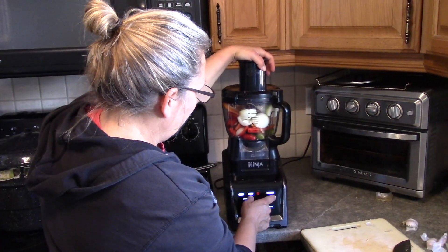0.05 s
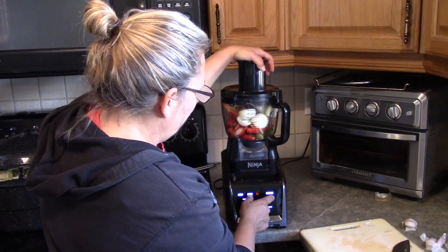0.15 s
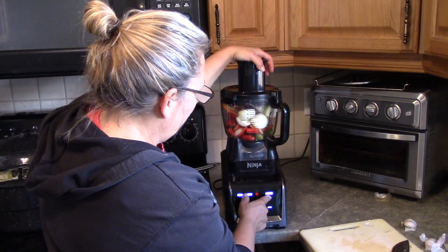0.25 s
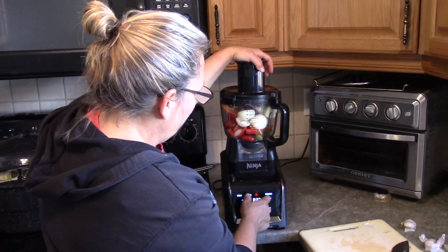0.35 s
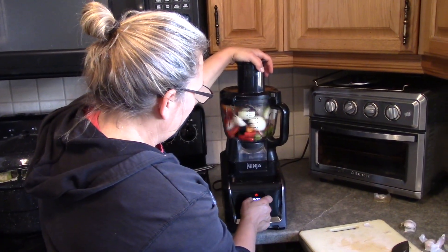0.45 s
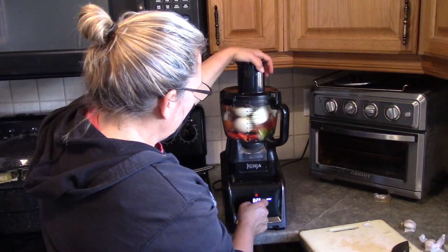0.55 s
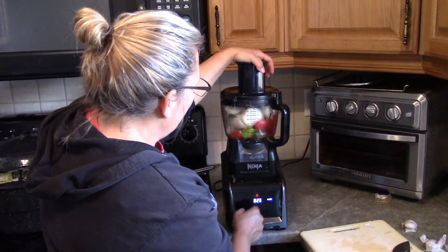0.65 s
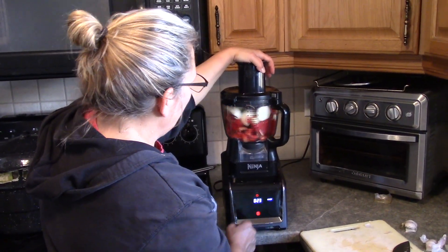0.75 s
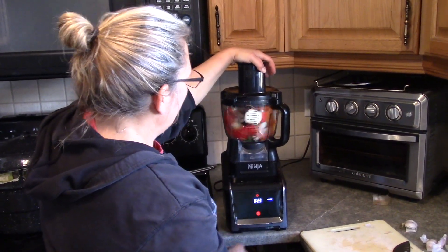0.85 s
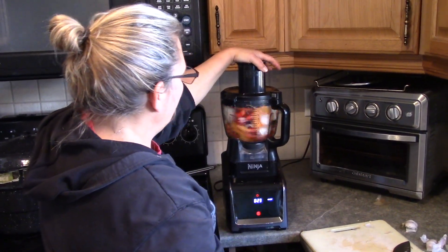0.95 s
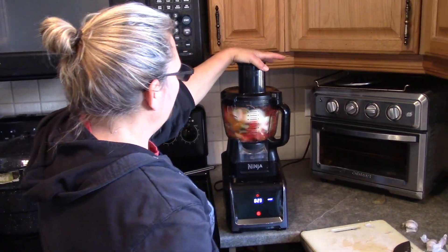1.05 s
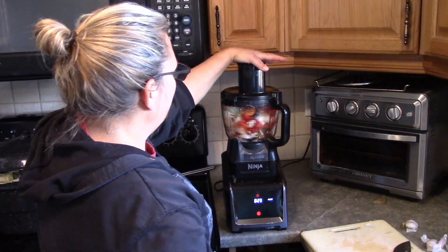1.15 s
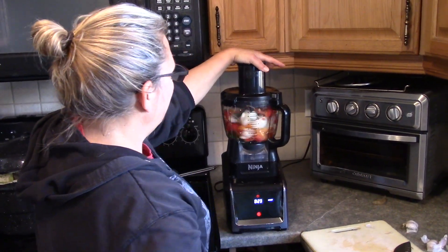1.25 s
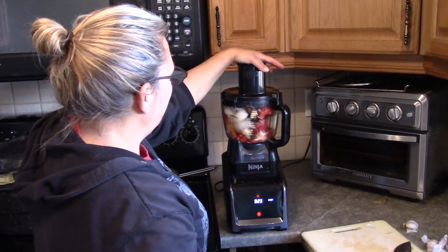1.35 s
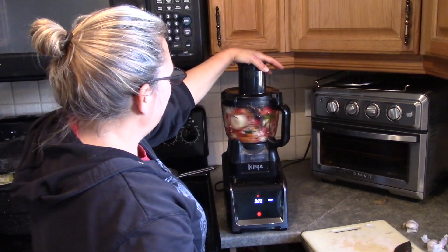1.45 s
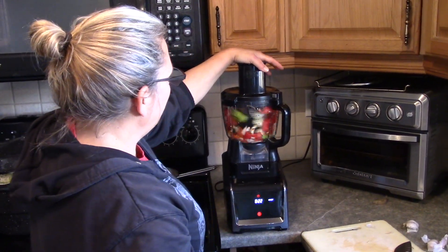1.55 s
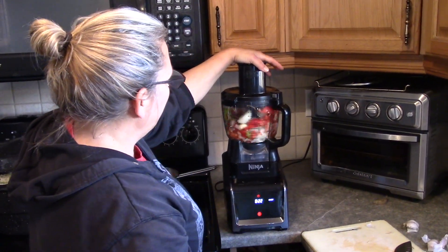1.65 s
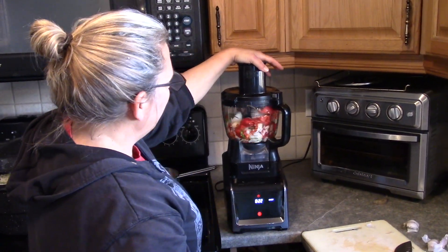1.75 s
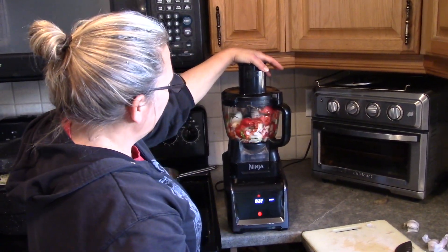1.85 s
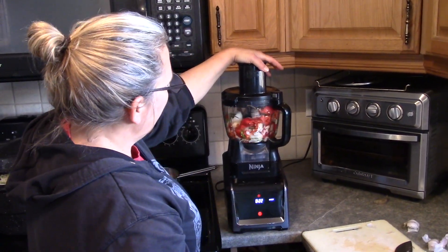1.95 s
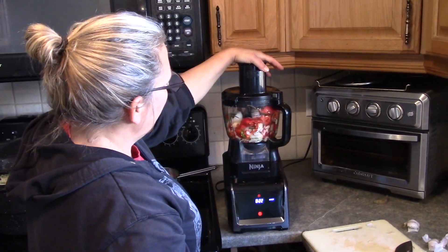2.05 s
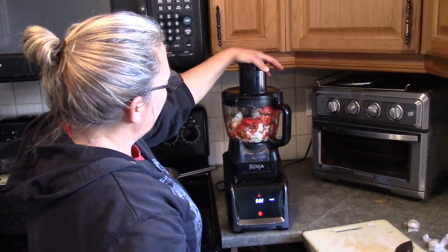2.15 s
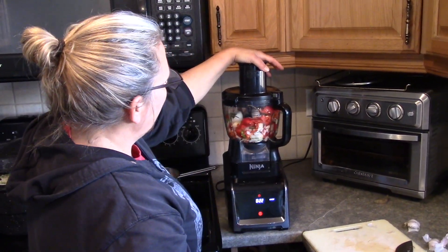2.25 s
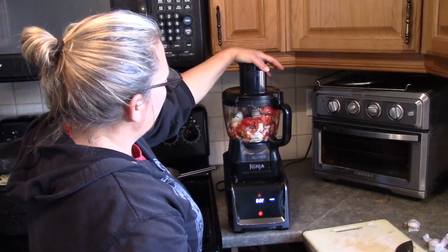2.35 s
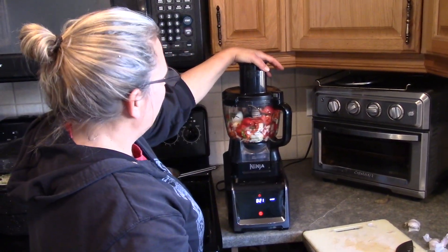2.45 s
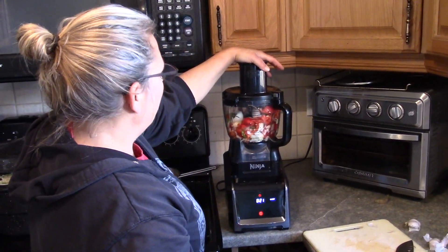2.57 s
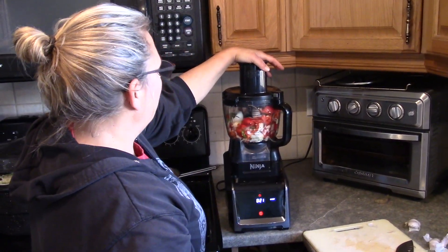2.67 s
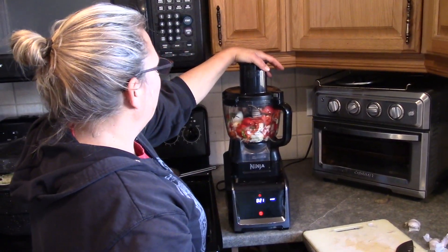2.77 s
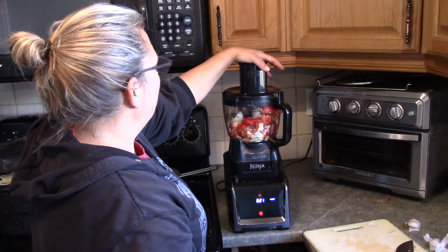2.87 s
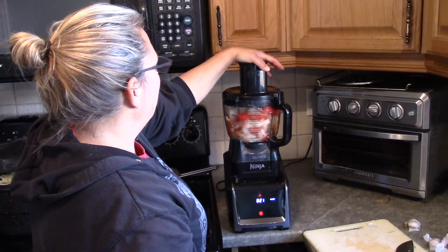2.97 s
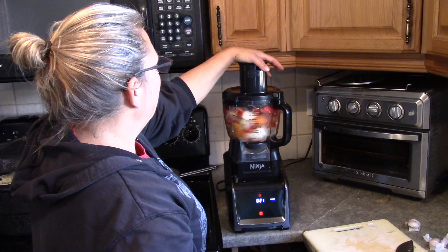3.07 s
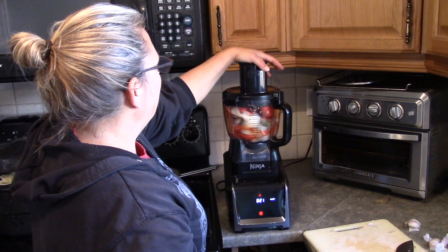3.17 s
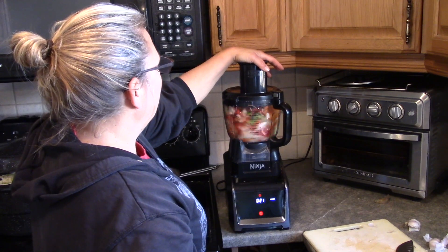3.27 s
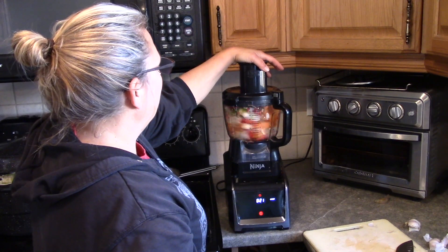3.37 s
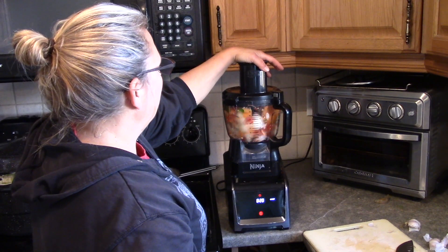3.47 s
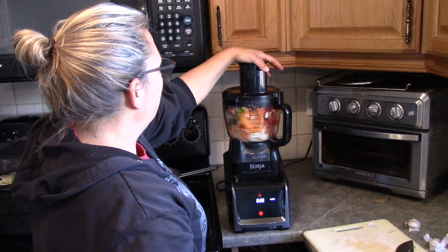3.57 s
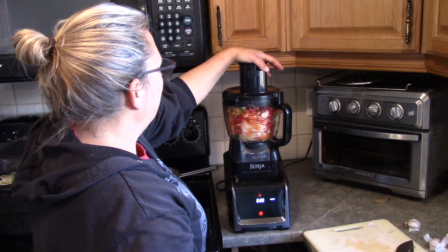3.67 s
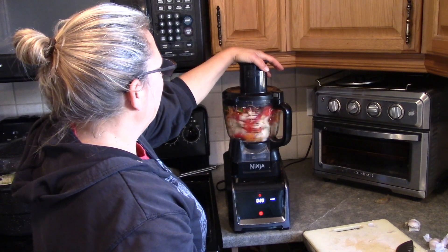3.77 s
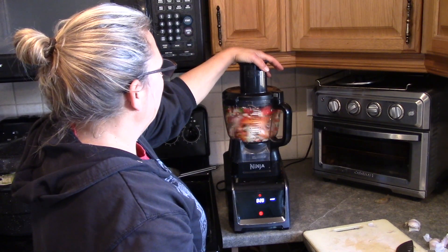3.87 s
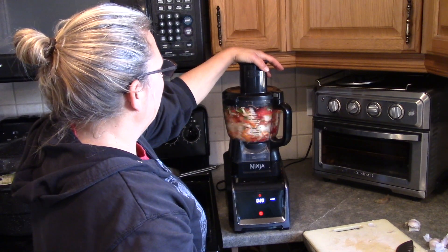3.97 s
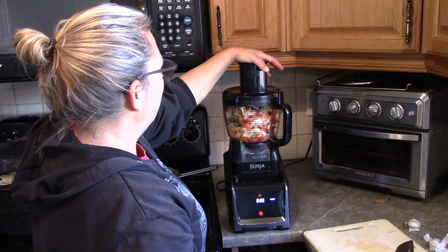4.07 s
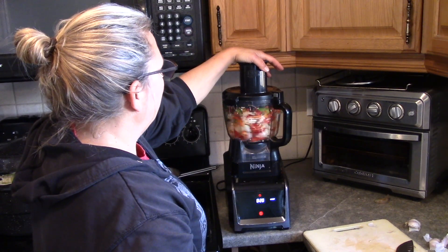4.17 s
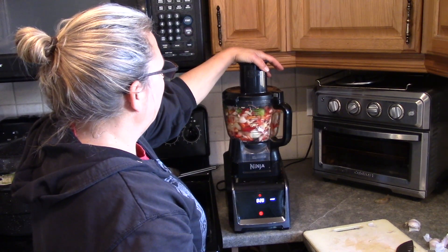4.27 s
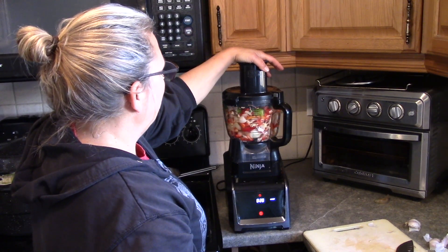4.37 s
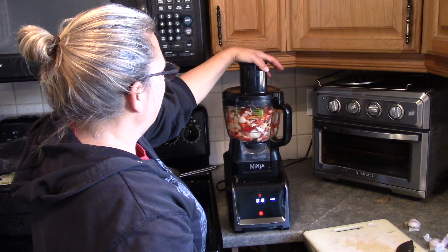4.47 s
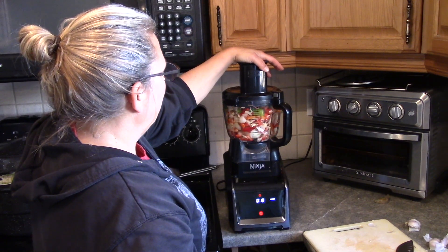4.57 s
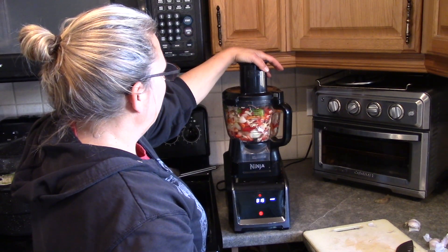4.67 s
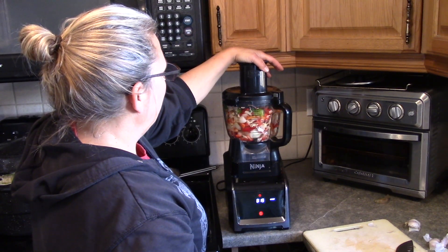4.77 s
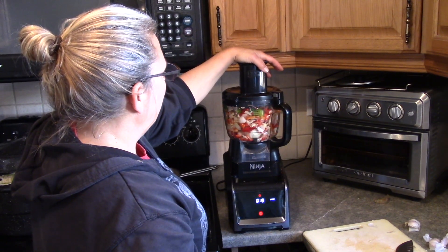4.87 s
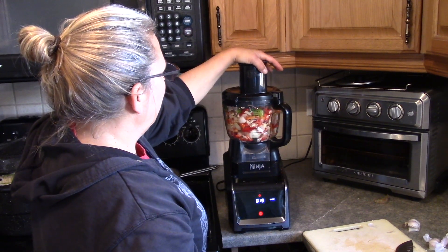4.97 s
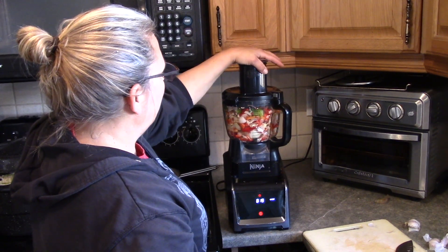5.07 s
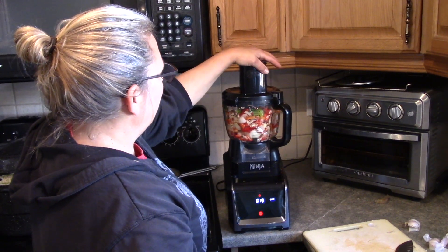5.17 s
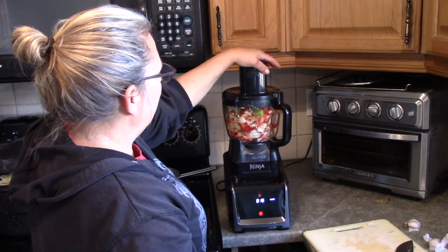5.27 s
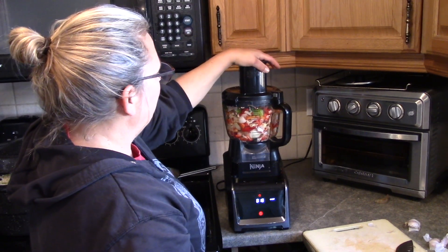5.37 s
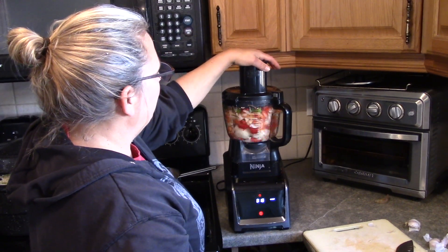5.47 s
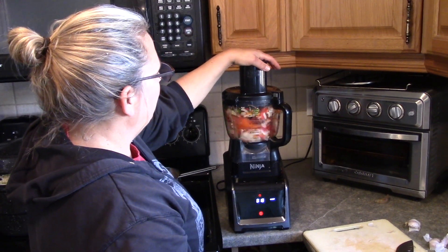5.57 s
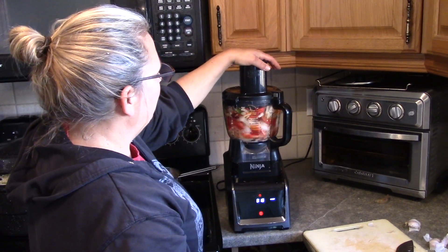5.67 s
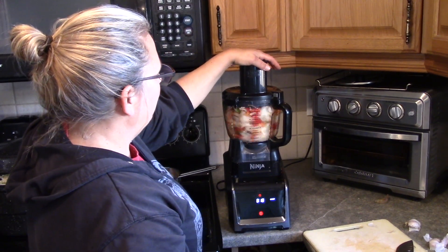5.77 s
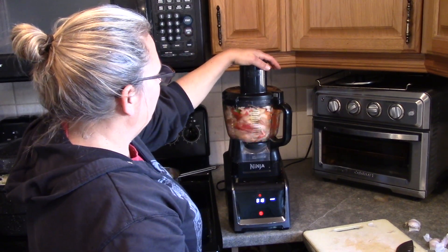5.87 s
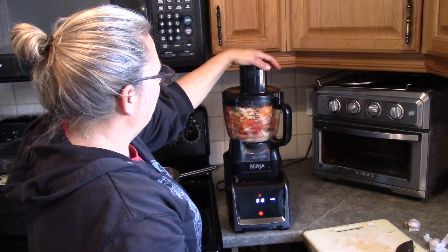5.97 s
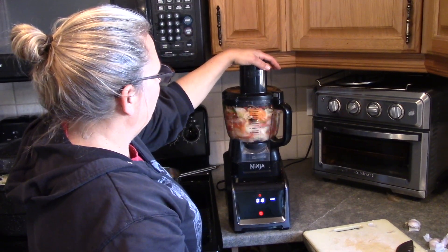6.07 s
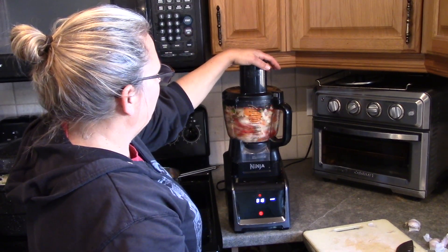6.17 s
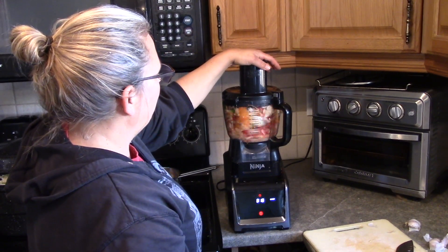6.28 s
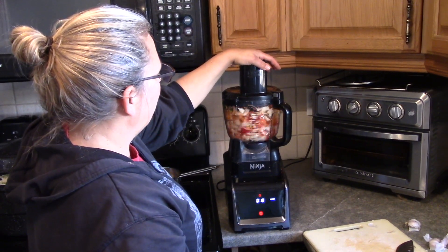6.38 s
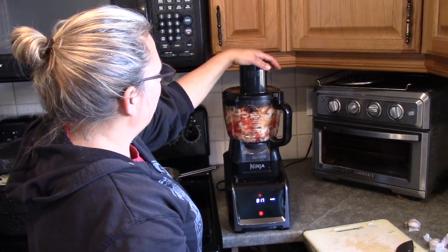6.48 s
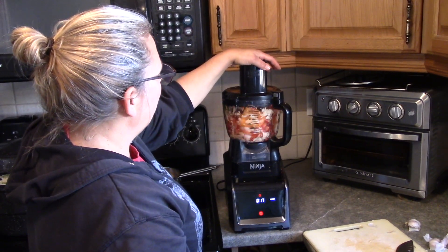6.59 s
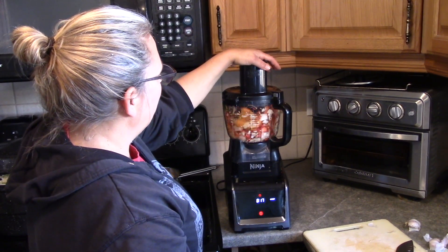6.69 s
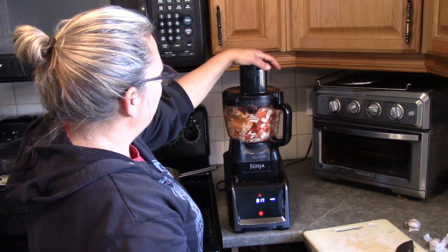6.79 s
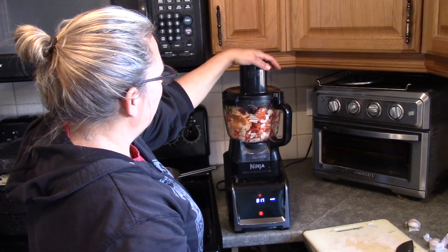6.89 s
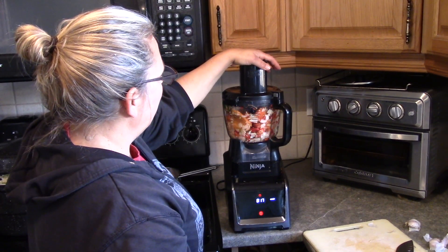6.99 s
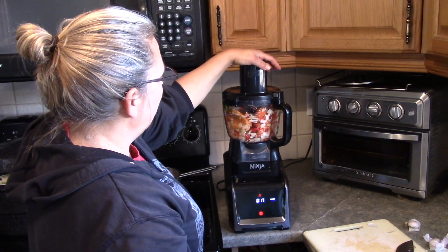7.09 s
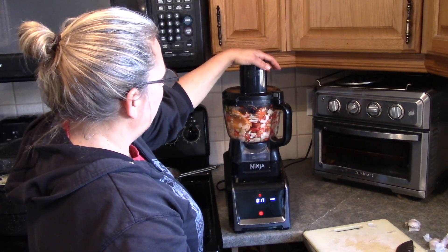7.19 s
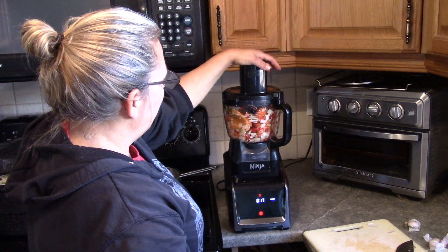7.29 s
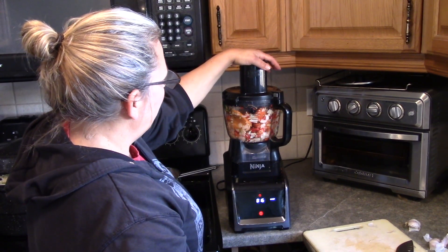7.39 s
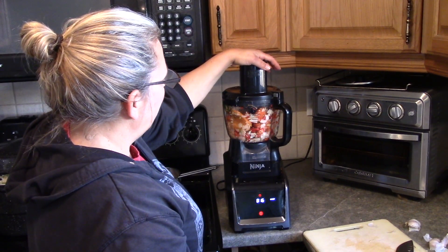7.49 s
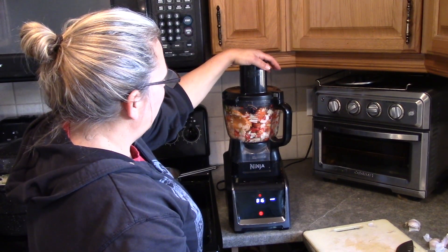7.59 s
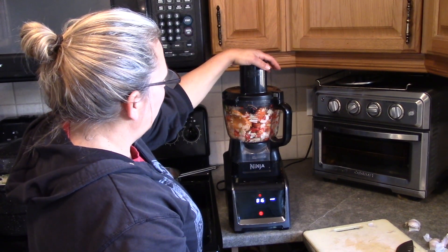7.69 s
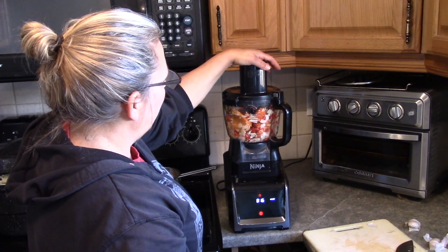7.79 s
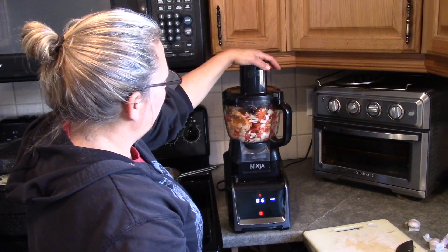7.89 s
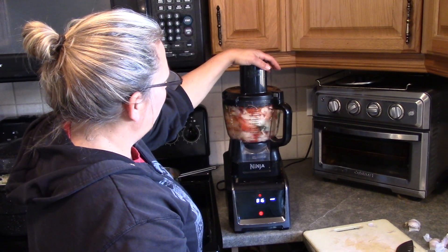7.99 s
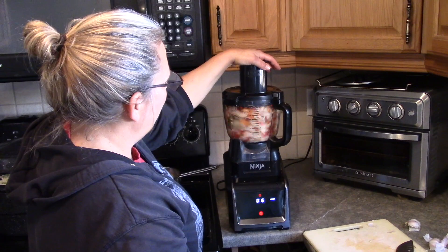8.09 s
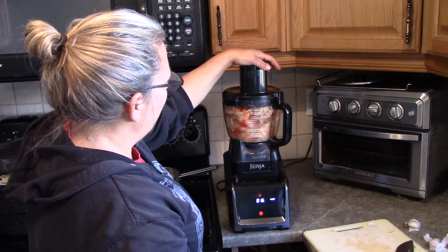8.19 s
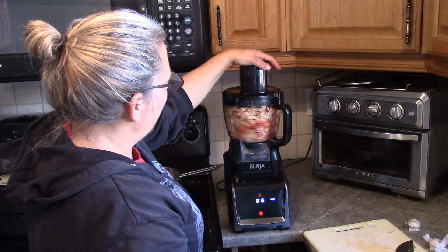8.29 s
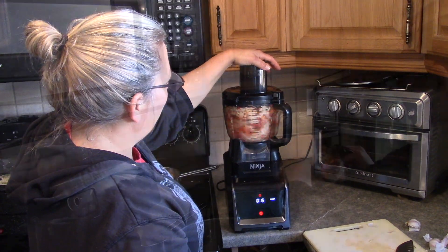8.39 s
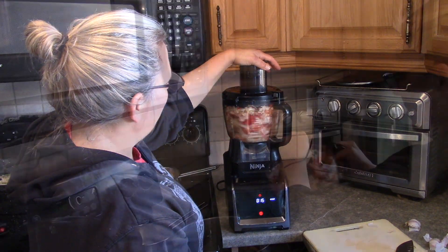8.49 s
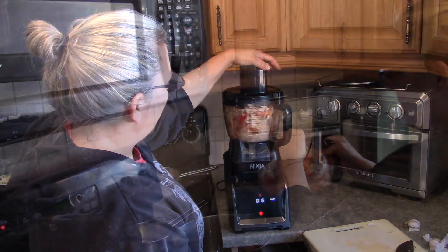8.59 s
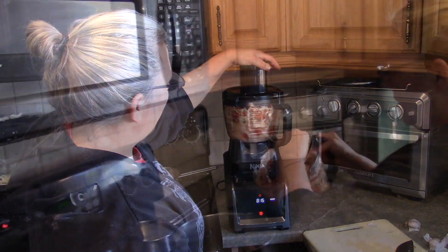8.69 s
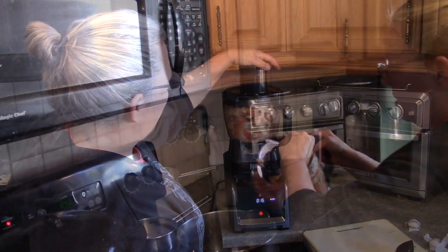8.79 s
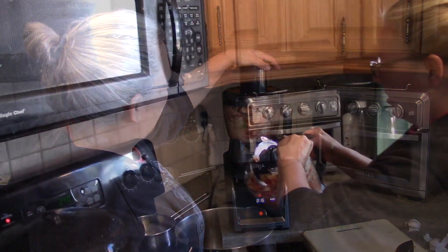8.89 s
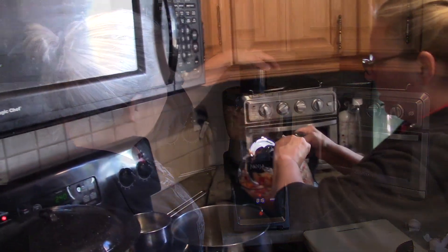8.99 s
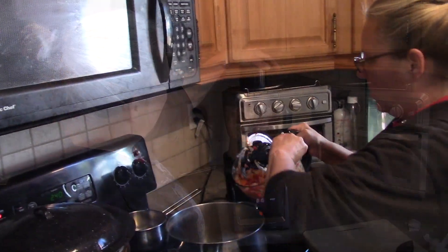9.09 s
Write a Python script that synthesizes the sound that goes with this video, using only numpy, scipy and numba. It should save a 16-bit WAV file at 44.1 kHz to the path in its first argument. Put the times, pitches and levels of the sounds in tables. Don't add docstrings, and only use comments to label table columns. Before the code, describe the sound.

Close to a nearly mono camera microphone, a food processor runs in four evenly spaced bursts. Each starts with a clack and rough lurch, climbs quickly in pitch, then sags into a shuddering coast as chopped pieces hail on the housing and the fan hisses. Low kitchen hum fills the gaps, with small metallic clicks and several dull knocks before the third burst. The first kick is sharpest, and the final coast fades away.

```python
import sys
import numpy as np
from scipy import signal
from scipy.fft import rfft, irfft, next_fast_len
from scipy.io import wavfile
from scipy.ndimage import uniform_filter1d
from numba import njit

SR = 44100
rng = np.random.default_rng(int(sys.argv[2]) if len(sys.argv) > 2 else 0)


def attenuation_scalar(level_db):
    decades = np.asarray(level_db, float) / 20
    return 10 ** decades


def unload_wav(signal):
    wavfile.write(
        sys.argv[1],
        SR,
        np.round(np.clip(np.atleast_2d(signal).T, -1, 1) * 32767).astype(np.int16),
    )


N = 403377

# start_s, peak_db, ring_share_db
STARTS = [
    (0.4078, -5.5, -9.5),
    (2.9072, -16.5, -11),
    (5.4078, -13, -10),
    (7.9074, -18.5, -9),
]


def level(x, db):
    return x * attenuation_scalar(db) / np.sqrt(np.mean(x ** 2))


@njit
def svf(x, hz, width):
    y, b, l = np.empty(len(x)), 0., 0.
    g, k = np.tan(np.pi * hz / SR), width / hz
    for i in range(len(x)):
        v = (b + g * (x[i] - l)) / (1 + g * (g + k))
        b, l, y[i] = 2 * v - b, l + 2 * g * v, k * v
    return y


def steep_band(x, hz, width):
    return svf(svf(x, float(hz), float(width)), float(hz), float(width))


def colour(x, spectrum, modes):
    size = next_fast_len(len(x))
    f = np.arange(size // 2 + 1) * SR / size + 1
    hz, db = np.transpose(spectrum)
    power = 1 + sum(attenuation_scalar(2 * d) / (1 + (2 * (f - c) / w) ** 2) for c, w, d in modes)
    gain = attenuation_scalar(np.interp(np.log(f), np.log(hz), db)) * np.sqrt(power)
    return irfft(rfft(x, size) * gain, size)[:len(x)]


def split(x, low_hz, high_hz):
    low, below = (signal.sosfiltfilt(signal.butter(2, f, fs=SR, output="sos"), x) for f in (low_hz, high_hz))
    return low, below - low, x - below


def walk(rate):
    k = int(SR / rate)
    held = np.repeat(rng.standard_normal(N // k + 1), k)
    return 1.3 * uniform_filter1d(uniform_filter1d(held, k), k)[:N]


def burst(s, t60):
    t = np.arange(N) / SR - s
    return (t >= 0) * np.exp(-np.log(1000) * np.clip(t, 0, 2) / t60)


def motor_state():
    # power_on_s, top_mesh_hz, stall_hz, coast_load_db, shudder_db
    pulses = [
        (0.505, 855, 198, -0.5, 2.5),
        (0.51, 849, 170, 1.5, 7),
        (0.51, 866, 115, 0, 7.5),
        (0.51, 866.5, 153, -1, -7),
    ]
    snatch_hz, climb_s = 306.7, .175
    coast_s, friction_hz = 2.5, 1712
    creep_hz = 45

    t, kick = np.arange(N) / SR, np.transpose(STARTS)[0]
    k = np.searchsorted(kick - .03, t) - 1
    row = np.transpose(pulses)[:, np.maximum(k, 0)]
    since = np.maximum(t - kick[k], 0) + 9 * (k < 0)
    on_s, top_hz = row[:2]
    climb = top_hz - (top_hz - snatch_hz) * np.exp(-np.minimum(since, on_s) / climb_s)
    hz = (climb + friction_hz) * np.exp(-np.maximum(since - on_s, 0) / coast_s) - friction_hz
    hz = creep_hz * np.logaddexp(0, hz / creep_hz)
    off = np.clip((since - on_s) / 0.13, 0, 1)
    return uniform_filter1d(np.maximum(hz, 1), 900), since, off, row


def floor_db():
    duck_db = [-3.5, -0.5, -1, 1]
    early_db, settle_s, recover_s = 3, 4.8, .25
    t = np.arange(N) / SR
    pulse = np.maximum(np.searchsorted(np.transpose(STARTS)[0], t) - 1, 0)
    sunk_db = (motor_state()[0] > 60) * np.array(duck_db)[pulse]
    hold = np.exp(-1 / (recover_s * SR))
    return -40.5 + early_db * np.exp(-t / settle_s) + signal.lfilter([1 - hold], [1, -hold], sunk_db)


def kitchen():
    # floor_hz, density_db
    floor_spectrum = [(15, -70), (25, -54), (64, -16.5), (145, -10), (200, -2), (301, -3.5), (326, -7),
                      (373, -0.5), (416, -7), (489, -3.5), (531, -7.5), (911, -10.5), (2990, -10.5),
                      (6560, -26), (16000, -44.5)]
    # centre_hz, width_hz, over_floor_db
    hum_modes = [(208, 38, 3.5), (496, 10, 5), (1504, 47, 3.5)]
    noise = level(colour(rng.standard_normal(N), floor_spectrum, hum_modes), 0)
    low, mid, high = split(noise, 410, 2200)
    air = low * attenuation_scalar(0.94 * walk(16)) + mid * attenuation_scalar(0.81 * walk(6)) + high * attenuation_scalar(.5 * walk(2.66))
    return air * attenuation_scalar(floor_db())


def ticks():
    # start_s, peak_db, ring_share_db
    tick_events = [
        (0.0882, -42, 0),
        (0.3915, -34, -15),
        (1.7833, -44, -6),
        (4.3006, -33.5, -6),
        (4.3321, -30.5, -5),
        (6.8922, -35.5, -9),
    ]
    # mode_hz, level_db, t60_s
    metal_modes = [(6360, -7, 0.12), (8700, 0, 0.032), (9400, -11, .03), (10400, -40, .04)]
    t, out = np.arange(N) / SR, 0
    for s, db, ring_db in tick_events:
        crack = burst(s, 0.081) * svf(svf(rng.standard_normal(N), 7900.0, 7000.), 7100.0, 7000.)
        ring = sum(attenuation_scalar(d) * burst(s, t60) * np.sin(2 * np.pi * hz * t) for hz, d, t60 in metal_modes)
        out = out + attenuation_scalar(db) * (crack + attenuation_scalar(ring_db - 3.5) * ring)
    return out


def running():
    switched = np.transpose(STARTS)[0] - .003
    t = np.arange(N) / SR
    return 1 - sum(burst(s, 0.06) + (np.abs(t - s + .05) < .05) for s in switched)


def kicks():
    noise = rng.standard_normal(N)
    crack = sum(attenuation_scalar(db) * burst(s, 0.15) for s, db, _ in STARTS) * noise
    shiver = sum(attenuation_scalar(db + ring_db) * burst(s, 0.17) for s, db, ring_db in STARTS) * noise
    body = steep_band(crack, 2400, 3000)
    edge = svf(svf(crack, 6500.0, 3700.0), 6500.0, 4100.0)
    return attenuation_scalar(2.0) * (body + attenuation_scalar(-9) * edge) + attenuation_scalar(12.5) * steep_band(shiver, 5400, 500)


def growl():
    since = motor_state()[1] / 0.041
    rumble = steep_band(rng.standard_normal(N), 334, 390)
    return level(rumble, -18.5) * since * np.exp(1 - since)


def effort_db(power, surge_db, share):
    surge_s = 0.05
    shudder_hz, shudder_width_hz = 231, 71
    fade_s, fade_db_per_s = 8.553, 28
    hz, since, off, (_, _, stall_hz, coast_db, shudder_db) = motor_state()
    stall = -1.47 * 10 * np.log10(1 + (stall_hz / hz) ** 4)
    surge = surge_db * since / surge_s * np.exp(1 - since / surge_s)
    shudder = share * shudder_db / (1 + (2 * (hz - shudder_hz) / shudder_width_hz) ** 2)
    fade = -fade_db_per_s * np.maximum(np.arange(N) / SR - fade_s, 0)
    return power * 20 * np.log10(hz / 830) + surge + stall + off * (coast_db + shudder) + fade


def whine():
    # centre_hz, width_hz, gain_db
    whine_modes = [(231, 105, 16.5), (514, 87, 20.5), (695, 183, 17.5), (848, 58, 12.5)]
    gear_per_rotor = 3.47
    hz, _, off, _ = motor_state()
    body = np.sqrt(1 + sum(attenuation_scalar(2 * d) / (1 + (2 * (hz - c) / w) ** 2) ** 2 for c, w, d in whine_modes))
    speed = hz / 830
    turn = 2 * np.pi * np.cumsum(hz) / SR
    slack = 1 + 2.2 * np.clip(.7 - speed, 0, 1)
    dropout_db = -5 * slack * walk(75) ** 2 * (.55 + .45 * off)
    teeth = turn + .45 * slack * walk(90)
    tone = np.sin(teeth) + attenuation_scalar(-11.5) * np.sin(3 * teeth)
    mesh = tone * body * attenuation_scalar(-23 + effort_db(power=1, surge_db=-1, share=0.37) + dropout_db)
    wobble = np.sin(turn / gear_per_rotor + 0.11 * walk(30))
    rotor = wobble * speed ** 3.5 * attenuation_scalar(1.1 * walk(27))
    return mesh + attenuation_scalar(-20) * svf(svf(rotor, 249.0, 160.0), 244.0, 160.0)


def rattle():
    # hail_hz, density_db
    hail_spectrum = [(25, -66), (70, -33), (145, -18.5), (230, -11.5), (440, -5.5), (800, -7), (1350, -9),
                     (2400, -11), (3900, -23.5), (7000, -31), (9600, -32.5), (10600, -42.5), (13500, -48.5),
                     (16000, -60)]
    # centre_hz, width_hz, over_hail_db
    housing_modes = [(218, 21, 3.5), (501.5, 34, 11.5), (596, 18, 9), (733, 58, 8.5), (1031, 78, 4),
                     (1353, 78, 12), (1534, 12, 9.5), (1980, 38, 2.5), (2330, 100, 4.5), (2668, 136, 4),
                     (3010, 74, 1.5), (3610, 25, 6), (4390, 37, 1.5), (5250, 1300, -2)]
    # full_speed_db, speed_power, starting_surge_db, shudder_share
    layer_laws = [(-18, 0.63, 10, 0.19), (-16.5, 0.033, 2.5, 0.56), (-15.5, 2.05, 6.5, 0.82),
                  (-25, 1.58, 7, 1)]
    strengths = attenuation_scalar(np.minimum(2.2 * rng.exponential(size=N), 12))
    hits = (rng.random(N) < 2500 / SR) * strengths
    hail = rng.standard_normal(N) * np.sqrt(1 + 4 * uniform_filter1d(hits ** 2, 80))
    thud, buzz, bright = split(colour(hail, hail_spectrum, housing_modes), 643, 1760)
    clatter, _, fan = split(bright, 5300, 3890)
    buzz_db, thud_db, clatter_db, fan_db = (db + effort_db(*law) for db, *law in layer_laws)
    buzz = level(buzz, 0) * attenuation_scalar(buzz_db + 1.8 * walk(40))
    thud = level(thud, -8.0) * attenuation_scalar(thud_db + 1.1 * walk(45))
    clatter = level(clatter, 0) * attenuation_scalar(clatter_db + 1.3 * walk(30))
    fan = level(fan, 0) * attenuation_scalar(fan_db + .8 * walk(20))
    tumble_db = (.5 + 1.2 * motor_state()[2]) * walk(14)
    return attenuation_scalar(tumble_db) * (thud + buzz + clatter + fan)


def bumps():
    # start_s, peak_db, centre_hz, width_hz, t60_s
    bump_events = [
        (2.103, -31.5, 220, 90, 0.14),
        (4.692, -36, 300, 300, 0.12),
        (4.824, -32, 695, 900, 0.13),
        (4.823, -40, 3000, 5000, 0.12),
        (4.97, -36, 1100, 400, .08),
        (5.179, -26, 545, 600, 0.19),
        (5.195, -33, 200, 150, 0.3),
        (5.181, -43, 2490, 4000, 0.14),
        (5.27, -39, 250, 300, 0.12),
        (7.805, -41, 2030, 60, 0.2),
    ]
    noise = rng.standard_normal(N)
    return sum(burst(s, t60) * level(steep_band(noise, hz, width), db)
               for s, db, hz, width, t60 in bump_events)


def scene():
    motor = running() * whine()
    near = motor + running() * rattle() + kicks() + ticks() + bumps() + growl()
    t = np.arange(SR // 3) / SR
    tails = rng.standard_normal((2, len(t))) * np.exp(-np.log(1000) * t / 0.4) * (t > .004)
    wet, wide = (signal.fftconvolve(near, tail)[:N] / np.sqrt(np.sum(tail ** 2)) for tail in tails)
    mid = near + attenuation_scalar(-9.5) * svf(wet, 2660.0, 9700.0) + kitchen()
    lean = attenuation_scalar(-32) * np.roll(motor, 12) + attenuation_scalar(-30.0) * svf(mid, 150., 710.0)
    side = lean + attenuation_scalar(-32.5) * svf(wide, 4900.0, 4000.) + attenuation_scalar(-21.5) * svf(kitchen(), 200., 900.)
    return np.array([mid + side, mid - side])


def top_cut(x):
    return signal.sosfilt(signal.butter(12, 16240, fs=SR, output="sos"), x)


def record(dry):
    rounded = .94 * dry / (1 + dry ** 4) ** .25
    no_top = signal.sosfilt(signal.ellip(10, .2, 70, 15750, fs=SR, output="sos"), rounded)
    mix = signal.sosfilt(signal.butter(2, 50, "high", fs=SR, output="sos"), no_top)
    return top_cut(mix)


dry = scene()
out = record(dry)
unload_wav(out)
```